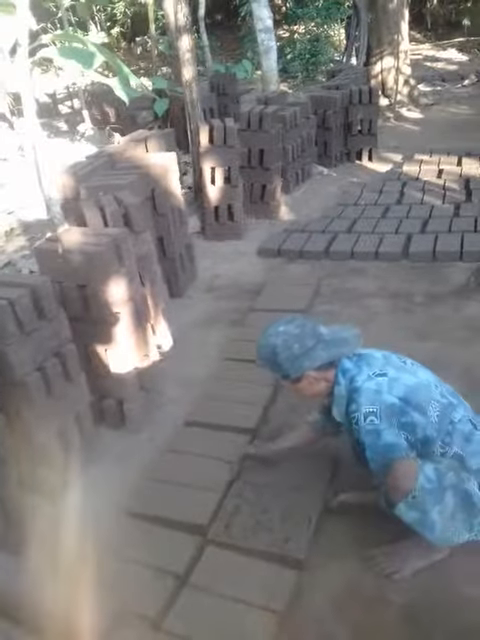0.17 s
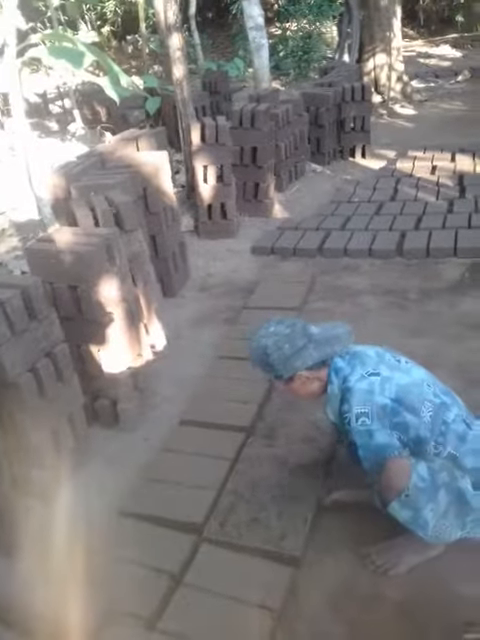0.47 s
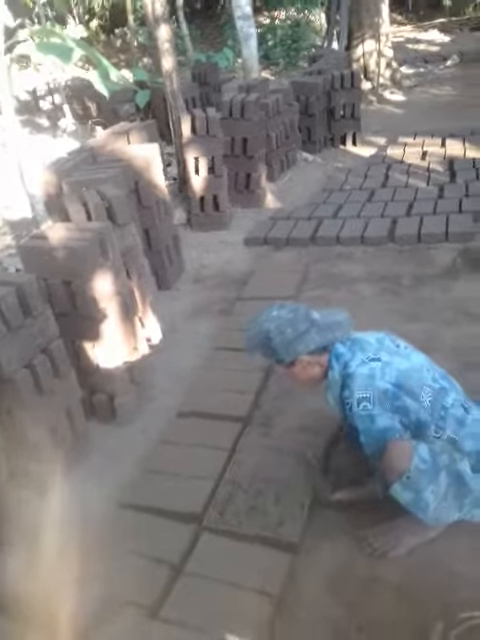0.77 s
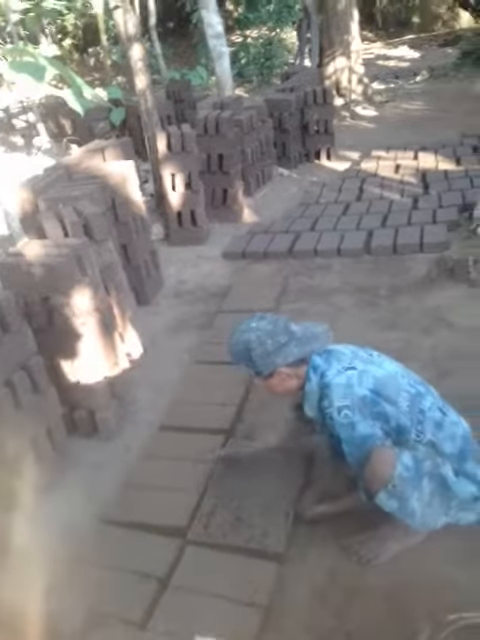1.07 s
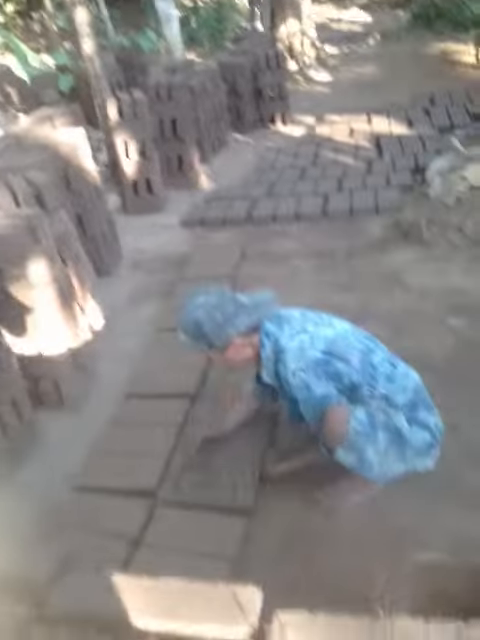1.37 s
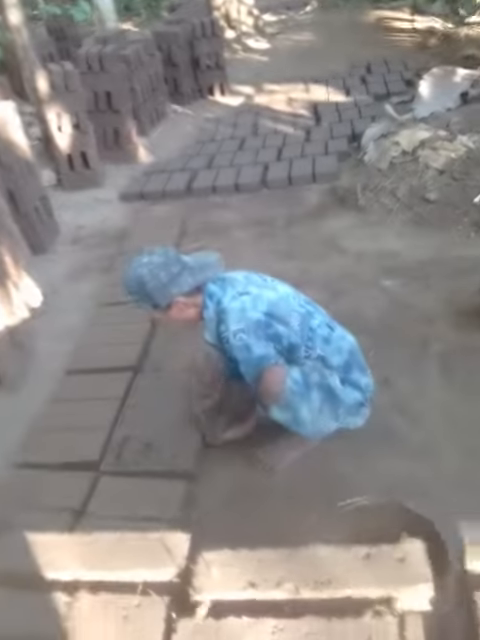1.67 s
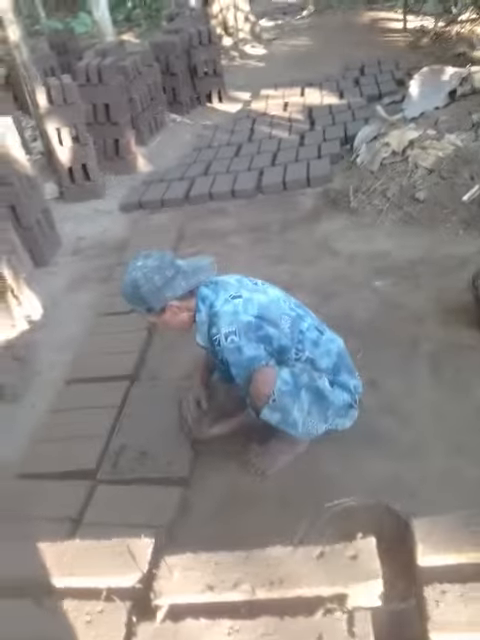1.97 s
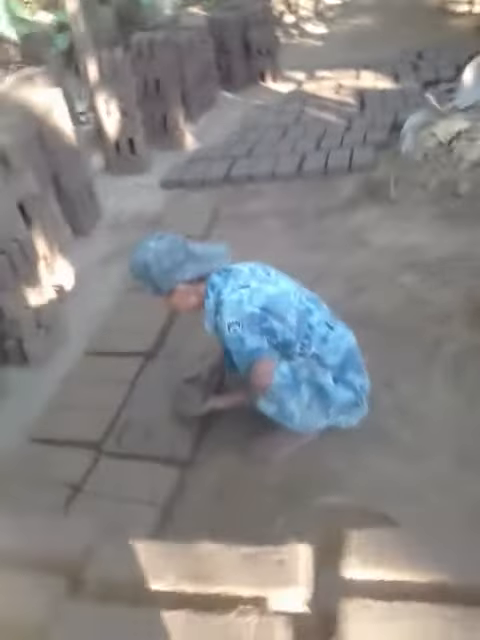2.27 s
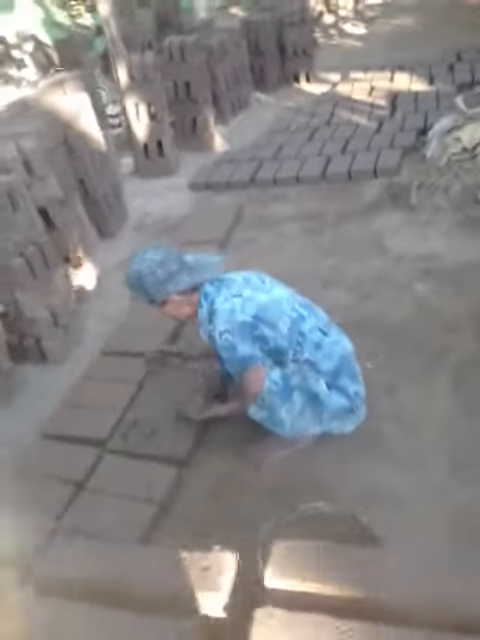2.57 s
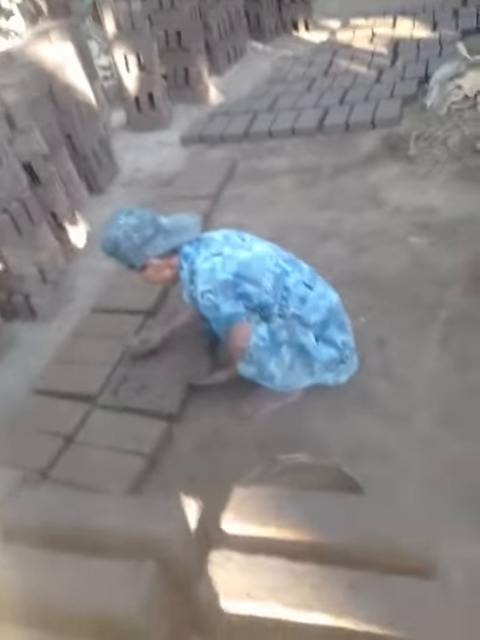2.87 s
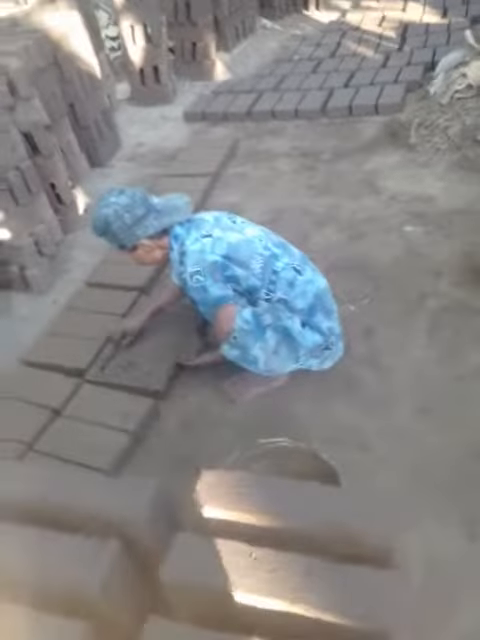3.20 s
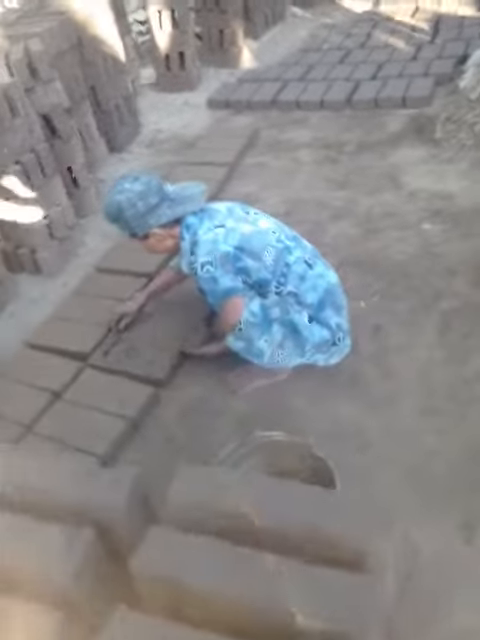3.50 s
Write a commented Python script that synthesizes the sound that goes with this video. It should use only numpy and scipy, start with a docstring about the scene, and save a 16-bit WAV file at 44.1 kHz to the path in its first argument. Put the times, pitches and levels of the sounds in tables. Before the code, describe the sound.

Wet clay is handled nearby, with gritty scrapes, sticky clicks, soft pats and faint hollow rubs of a wooden mould. Light strokes start around 0.4 seconds, cluster near 1.5 and 2.1, then crowd together from 2.7, loudest at 3.6. High insects drone throughout over a faint rumble and leaves, turning shriller near 2 seconds. A bird repeats a falling two-note whistle about every half second, with faint chirps further off.

```python
"""A brick maker works wet clay on the sandy ground of a yard among trees; the sound is almost mono.
From the start, insects drone over a distant rumble and leaves, one with a fast pulsed buzz.
A bird begins repeating a falling two-note whistle that echoes in the grove. Sand grains slip in gritty
scrapes, the wooden mould rubs hollowly, and the clay clicks and takes soft pats from hand and mould.
Near 2 s a second insect's shrill swells; from 2.7 s the strokes crowd together and grow louder."""
import sys
import numpy as np
from scipy import signal
from scipy.fft import rfft, irfft, next_fast_len
from scipy.io import wavfile
from scipy.ndimage import map_coordinates

SR = 44100
rng = np.random.default_rng(int(sys.argv[2]) if len(sys.argv) > 2 else 0)


def materialize(psi):
    """Save the field psi as 16-bit PCM at rate SR to the path in sys.argv[1].

    A 1-D psi becomes a single channel; in a 2-D psi each row is a channel.
    """
    bounded = np.clip(np.atleast_2d(psi).T, -1, 1)
    quanta = np.round(bounded * 32767).astype(np.int16)
    wavfile.write(sys.argv[1], SR, quanta)


N = 160524


def amp(db):
    """Decibels to gain."""
    return 10 ** (np.asarray(db) / 20)


def unit(x):
    """Scale to rms 1."""
    return x / np.sqrt(np.mean(x ** 2) + 1e-20)


def clock(size=N):
    """Sample times in s."""
    return np.arange(size) / SR


def gain_at(spectrum, hz):
    """Gain from (freq_hz, gain_db) points, interpolated on a log frequency axis."""
    freq_hz, gain_db = np.transpose(spectrum)
    return amp(np.interp(np.log(hz + 1), np.log(freq_hz + 1), gain_db))


def curves(rows):
    """One per-sample curve for each column after time_s."""
    time_s, *columns = np.transpose(rows)
    return [np.interp(clock(), time_s, column) for column in columns]


def wobble(rate_hz):
    """Smooth random curve, rate_hz knots a second."""
    knots = rng.standard_normal(int(N * rate_hz / SR) + 4)
    return map_coordinates(knots, [clock() * rate_hz])


def filtered(x, response):
    """Zero-phase filter with gain response(hz)."""
    size = x.shape[-1]
    padded = next_fast_len(size + 8192)
    gain = response(np.fft.rfftfreq(padded, 1 / SR))
    return irfft(rfft(x, padded) * gain, padded)[..., :size]


def coloured(x, spectrum):
    """x shaped by a spectrum, rms 1."""
    return unit(filtered(x, lambda hz: gain_at(spectrum, hz)))


def narrow(centre_hz, half_width_hz, size=N):
    """Noise in one resonance, rms 1."""
    noise = rng.standard_normal(size)
    return unit(filtered(noise, lambda hz: 1 / (1 + ((hz - centre_hz) / half_width_hz) ** 2)))


def swell(peak_s, rise_s, release_s):
    """Gaussian rise, exponential release."""
    t = clock() - peak_s
    return np.exp(-np.where(t < 0, (t / rise_s) ** 2, t / release_s))


def burst(size, decay_s, attack_s=0.00011):
    """Contact envelope: sharp attack, exponential decay."""
    t = clock(size)
    return np.exp(-t / decay_s) * (1 - np.exp(-t / attack_s))


def add(track, start_s, sound):
    """Mix a sound into the track."""
    part = track[max(round(start_s * SR), 0):][:len(sound)]
    part += sound[:len(part)]


def friction(spectrum, grains_per_s=2000, spread_db=3.2, smooth_gain=.6, clump_db=2.0):
    """Clumped slips of sand grains over a smooth rub, rms 1."""
    slips = (rng.random(N) < grains_per_s / SR) * rng.choice([-1, 1], N)
    strength = amp(spread_db * np.minimum(rng.exponential(size=N), 5))
    rub = unit(slips * strength) + smooth_gain * rng.standard_normal(N)
    return unit(coloured(rub, spectrum) * amp(clump_db * wobble(140)))


# Sand hiss spectrum: freq_hz, gain_db
SAND_SPECTRUM = [(100, -66), (1000, -29), (2000, -0.5), (3000, -6), (3800, -6.5), (5000, -2), (6200, 0.5),
                 (7500, 3), (9500, 2), (11500, -11.5), (13000, -13.5), (16000, -18.5)]
# Dull clay spectrum: freq_hz, gain_db
CLAY_SPECTRUM = [(80, -80), (250, -26), (480, -0.5), (720, -9.5), (950, 2), (1250, 3.5), (1550, -1),
                 (1900, 1), (2300, -2.5), (3200, -6), (5000, -11), (12000, -58)]
# Strokes through the clay: peak_s, rise_s, release_s, hiss_db, dull_db
STROKES = [(.43, 0.099, 0.24, -62.5, -87), (.575, 0.033, 0.053, -53.5, -63),
           (0.651, .02, 0.0098, -54.5, -62), (0.729, 0.024, 0.012, -56, -60), (.99, 0.051, 0.055, -69, -65),
           (1.13, 0.01, 0.0081, -62, -57), (1.22, .03, 0.038, -67.5, -64), (1.40, 0.14, 0.18, -63, -63),
           (1.64, 0.066, 0.052, -50.5, -58), (1.85, 0.065, 0.075, -66.5, -73),
           (2.106, 0.0067, 0.058, -50.5, -51.5), (2.175, 0.0077, 0.031, -51.5, -54),
           (2.736, 0.01, 0.0071, -58, -56.5), (2.934, .015, 0.019, -42.5, -47.5),
           (2.997, 0.017, 0.014, -47.5, -51), (3.046, 0.017, .03, -48, -48),
           (3.085, 0.015, 0.024, -51, -48), (3.18, 0.055, 0.3, -56.5, -56.5), (3.24, .015, 0.009, -56, -57),
           (3.381, 0.028, 0.0088, -58.5, -52), (3.456, 0.0087, 0.015, -44.5, -49.5),
           (3.539, 0.029, 0.052, -44.5, -51), (3.611, 0.023, .03, -41, -46.5),
           (3.636, .01, .03, -31.5, -33)]


def scrapes():
    """Each stroke through the sandy clay makes a gritty hiss and a dull rub."""
    hiss = sum(amp(hiss_db) * swell(*timing) for *timing, hiss_db, _ in STROKES)
    dull = sum(amp(dull_db) * swell(*timing) for *timing, _, dull_db in STROKES)
    return hiss * friction(SAND_SPECTRUM) + dull * friction(CLAY_SPECTRUM)


# Crack spectrum: freq_hz, gain_db
CRACK_SPECTRUM = [(100, -16), (1000, -18.5), (2200, -5), (3500, -15), (4700, -4), (6200, -7.5), (7200, -9),
                  (8200, 4.5), (9600, -3), (11500, -9.5), (16000, -18)]
# Sticky clicks: start_s, level_db, ring_hz, ring_gain_db, cutoff_hz
CLICKS = [(.427, -52, 6000, -4, 11000), (0.5519, -44.5, 7000, -4, 13000), (.572, -47, 5940, 0, 13000),
          (0.796, -58, 10300, 4, 14000), (.829, -58.5, 9800, 5, 12000), (1.013, -56.5, 6250, 7.5, 10000),
          (1.2318, -60.5, 2970, 8.5, 6000), (1.385, -53, 2850, 5, 10000), (1.404, -51, 9200, 16.5, 11000),
          (1.4325, -52, 8060, 3, 10000), (1.449, -47, 6500, -3, 10000), (1.461, -44.5, 4760, -1.5, 9150),
          (1.547, -40, 7500, -7, 11000), (1.843, -53.5, 2550, 1, 9030), (1.9822, -42, 4630, -7.5, 11300),
          (2.172, -38, 7100, -4, 13000), (2.378, -52.5, 8400, 2, 10000), (2.424, -50.5, 4870, -1, 9000),
          (2.441, -47, 7540, -3, 8900), (2.7308, -44, 7500, -10, 11000), (2.802, -30.5, 8160, 1.5, 20000),
          (2.9066, -34, 7330, -2.5, 20000), (2.933, -40, 2940, -11, 13000), (3.45, -42.5, 6500, -2, 13000),
          (3.516, -41.5, 7460, 2, 13000)]


def sticky_clicks(bounce_s=0.0049, bounce_db=-13):
    """Wet clay clicks: a bright crack and ring, then a quick, weaker second contact."""
    out, size = np.zeros(N), SR // 25
    envelope = burst(size, decay_s=0.0023)
    for start_s, level_db, ring_hz, ring_gain_db, cutoff_hz in CLICKS:
        for delay_s, contact_db in [(0, 0), (bounce_s, bounce_db)]:
            crack = coloured(rng.standard_normal(size), CRACK_SPECTRUM)
            crack = filtered(crack, lambda hz: 1 / np.hypot(1, (hz / cutoff_hz) ** 6))
            ring = amp(ring_gain_db) * narrow(ring_hz, half_width_hz=830, size=size)
            add(out, start_s + delay_s, amp(level_db + contact_db) * envelope * (crack + ring))
    return out


# Pats on the clay: start_s, level_db, ring_hz
PATS = [(0.734, -56, 650), (1.203, -47.5, 1940), (1.4665, -39.5, 1030), (1.547, -44.5, 2200),
        (1.627, -47, 1360), (1.642, -41.5, 1270), (1.674, -44.5, 1060), (2.098, -39.5, 2020),
        (2.1186, -34, 1940), (2.729, -45, 1310), (2.803, -43, 1790), (2.905, -44, 1100),
        (2.933, -38.5, 530), (3.002, -42.5, 2200), (3.389, -42.5, 1470), (3.452, -43.5, 1800),
        (3.616, -38.5, 1090)]


def pats(ring_gain_db=4.5):
    """Hand and mould strike the clay: a dull knock with a hollow ring."""
    out, size = np.zeros(N), SR // 25
    envelope = burst(size, decay_s=0.003)
    for start_s, level_db, ring_hz in PATS:
        knock = coloured(rng.standard_normal(size), CLAY_SPECTRUM)
        ring = amp(ring_gain_db) * narrow(ring_hz, half_width_hz=0.13 * ring_hz, size=size)
        add(out, start_s, amp(level_db) * envelope * unit(knock + ring))
    return out


# Mould rubs: peak_s, rise_s, release_s, pitch_hz, level_db
MOULD_RUBS = [(.21, 0.03, .05, 1060, -65.5), (.73, 0.018, 0.016, 594, -58.5), (1.22, 0.05, 0.019, 780, -60),
              (2.80, .04, .05, 1200, -53), (2.86, 0.091, 0.24, 950, -59.5),
              (3.08, 0.086, 0.022, 1050, -51.5)]


def mould_rubs():
    """The wooden mould rubs with a hollow note."""
    return sum(amp(level_db) * swell(*timing) * narrow(pitch_hz, half_width_hz=193)
               for *timing, pitch_hz, level_db in MOULD_RUBS)


def slur(start_hz, end_hz, length_s, echo_db, direct_db=-4.5, waver=.02):
    """One wavering, falling bird note, smeared by the grove."""
    progress = np.clip(clock(int(.8 * SR)) / length_s, 0, 1)
    glide_hz = start_hz * (end_hz / start_hz) ** progress
    pitch_hz = glide_hz * (1 + waver * wobble(415)[:len(progress)])
    arch = np.interp(progress, [0, .55, 1], [0, .5, 1])  # peak at 55 % of the note
    envelope = np.abs(np.sin(np.pi * arch)) ** .7
    note = envelope * np.sin(2 * np.pi * np.cumsum(pitch_hz) / SR)
    return amp(direct_db) * note + amp(echo_db) * echo(note, t60_s=.45)


# Near bird's calls: start_s, pitch_hz, level_db, low_note_gain_db
WHISTLES = [(.26, 5453, -56.5, 0), (0.877, 5290, -54.5, 0.5), (1.526, 5440, -56, 0.5),
            (2.011, 5576, -54, 4), (2.44, 5514, -52.5, -1), (3.065, 5170, -54, 0), (3.453, 5340, -51, -2)]


def near_bird():
    """Each call is a high slur overlapped by a lower one."""
    out = np.zeros(N)
    for start_s, pitch_hz, level_db, low_note_gain_db in WHISTLES:
        high = slur(pitch_hz, .72 * pitch_hz, length_s=.1, echo_db=0)
        low = slur(.655 * pitch_hz, .47 * pitch_hz, length_s=.072, echo_db=0)
        add(out, start_s + .006, amp(level_db) * high)
        add(out, start_s + .078, amp(level_db + low_note_gain_db) * low)
    return out


# Far birds' chips: start_s, start_hz, end_hz, length_s, level_db
CHIPS = [(1.17, 4880, 4450, .07, -64), (1.274, 10300, 9400, 0.062, -59.5), (1.483, 3370, 2820, .03, -59),
         (1.793, 3380, 2940, .03, -63), (2.305, 4770, 4410, 0.1, -63), (2.376, 3360, 2790, 0.027, -53.5),
         (2.652, 3270, 2700, 0.027, -52), (2.85, 4860, 4400, .06, -60)]


def far_birds():
    """Other birds give faint falling chips further off."""
    out = np.zeros(N)
    for start_s, start_hz, end_hz, length_s, level_db in CHIPS:
        add(out, start_s, amp(level_db) * slur(start_hz, end_hz, length_s, echo_db=-9))
    return out


# Levels of the two nearest insects: time_s, buzz_db, shrill_db
NEAR_INSECT_LEVELS = [(0, -64, -76), (.9, -62, -73), (1.6, -63, -69), (2.1, -65, -63.5), (2.7, -66, -61),
                      (3.64, -66, -63)]


def near_insects(buzz_hz=7750, drift_hz=25, pulse_hz=117.6, pulse_depth=1.35, shrill_hz=7900):
    """One insect buzzes in regular pulses; a second shrills beside it."""
    buzz_db, shrill_db = curves(NEAR_INSECT_LEVELS)
    pulse_phase = 2 * np.pi * np.cumsum(pulse_hz * (1 + 0.0046 * wobble(5))) / SR
    pulses = np.exp(pulse_depth * (np.cos(pulse_phase) + np.cos(2 * pulse_phase)) / 2)
    pitch_hz = buzz_hz + drift_hz * wobble(60)
    tone = unit(np.sin(2 * np.pi * np.cumsum(pitch_hz) / SR))
    blur = .5 * narrow(buzz_hz, half_width_hz=140)
    buzz = amp(buzz_db) * unit(pulses * (tone + blur))
    shrill = amp(shrill_db) * narrow(shrill_hz, half_width_hz=110)
    return buzz + shrill


# Distant insect drones: pitch_hz, half_width_hz, level_db
FAR_INSECTS = [(5800, 180, -73.5), (8750, 130, -80), (13800, 90, -88)]
# Insect chorus spectrum: freq_hz, gain_db
CHORUS_SPECTRUM = [(5200, -47), (6200, -42), (6650, -16), (7100, -3), (7700, 2), (8000, 0), (8300, -28),
                   (9000, -10), (9500, -25), (11000, -33), (13000, -46)]
# Insect chorus level: time_s, level_db
CHORUS_LEVEL = [(0, -66), (.9, -58.5), (1.6, -63.5), (2.1, -58), (2.7, -57), (3.64, -58.5)]


def far_insects(waver_db=.7):
    """Three distant insects drone in narrow bands; the rest blur into a chorus."""
    drones = sum(amp(level_db + wobble(6.3)) * narrow(pitch_hz, half_width_hz)
                 for pitch_hz, half_width_hz, level_db in FAR_INSECTS)
    chorus_db, = curves(CHORUS_LEVEL)
    chorus_gain = amp(chorus_db + waver_db * wobble(8.57))
    return drones + chorus_gain * coloured(rng.standard_normal(N), CHORUS_SPECTRUM)


# Rumble and leaf spectrum: freq_hz, gain_db
AIR_SPECTRUM = [(20, -10), (45, -22.5), (80, 0), (140, 2), (300, -4), (600, -7), (850, -11.5), (1200, -8.5),
                (2200, -15), (3100, -16.5), (3800, -19), (4600, -14), (5300, -27), (9000, -22),
                (12000, -33.5), (16000, -32)]
# Rumble and leaf level: time_s, level_db
AIR_LEVEL = [(0, -61.5), (.6, -61.5), (1.3, -59.5), (1.95, -61.5), (2.6, -57.5), (3.64, -57.5)]


def rumble_and_leaves(waver_db=0.17):
    """Distant rumble and the murmur of leaves as one noise bed."""
    level_db, = curves(AIR_LEVEL)
    return amp(level_db + waver_db * wobble(6.2)) * coloured(rng.standard_normal(N), AIR_SPECTRUM)


def echo(x, t60_s, build_s=0.02):
    """Diffuse reflections from trunks and brick stacks."""
    t = clock(int(.7 * SR))
    tail = rng.standard_normal(len(t)) * amp(-60 * t / t60_s) * (1 - np.exp(-t / build_s))
    return signal.fftconvolve(x, tail / np.linalg.norm(tail))[:len(x)]


# Stereo side response of the surroundings: freq_hz, gain_db
SIDE_RESPONSE = [(30, -28), (70, -20), (130, -21.5), (300, -15.5), (1000, -14), (2500, -13.5), (5000, -17),
                 (7700, -37), (12000, -5.5)]


def scene(yard_echo_db=-19):
    """Near clay in the centre; surroundings with a faint diffuse width."""
    clay = scrapes() + sticky_clicks() + pats() + mould_rubs()
    around = amp(yard_echo_db) * echo(clay, t60_s=0.52)
    around += near_bird() + far_birds() + near_insects() + far_insects() + rumble_and_leaves()
    side = filtered(echo(around, t60_s=.16), lambda hz: gain_at(SIDE_RESPONSE, hz))
    return clay + around + np.array([side, -side])


def record(dry):
    """Recorder band limit: 15850 Hz."""
    return filtered(dry, lambda hz: hz < 15850)


dry = scene()
out = record(dry)
materialize(out)
```